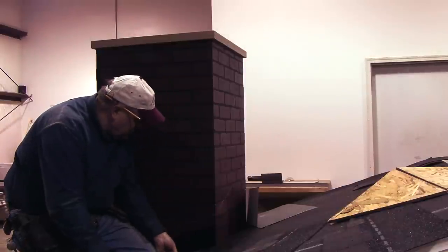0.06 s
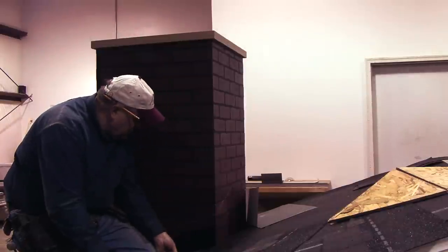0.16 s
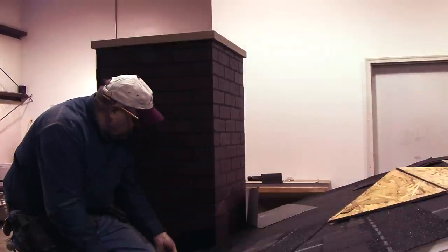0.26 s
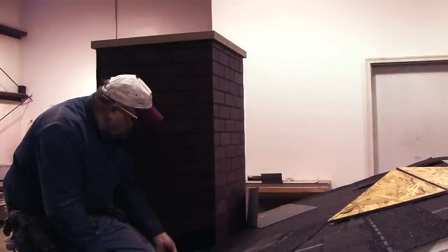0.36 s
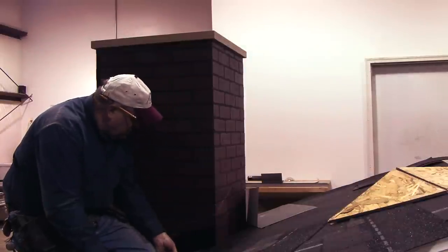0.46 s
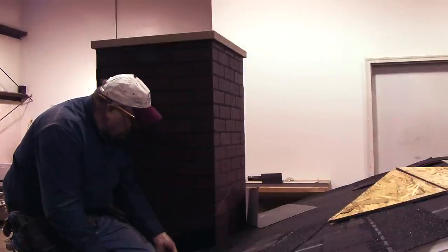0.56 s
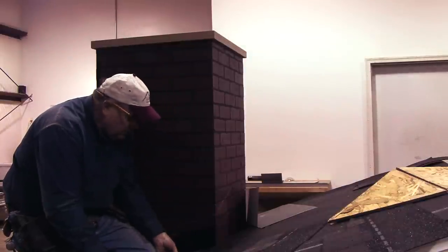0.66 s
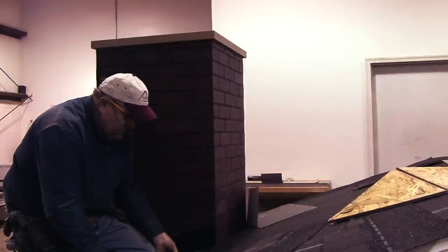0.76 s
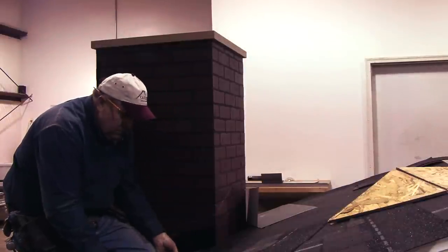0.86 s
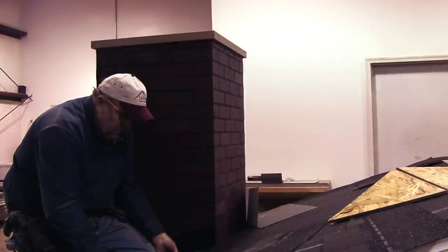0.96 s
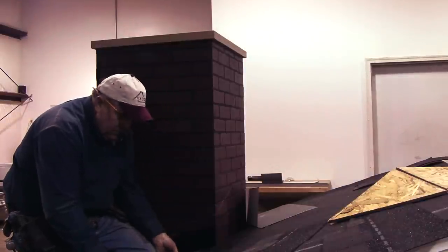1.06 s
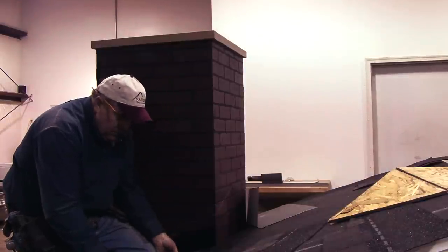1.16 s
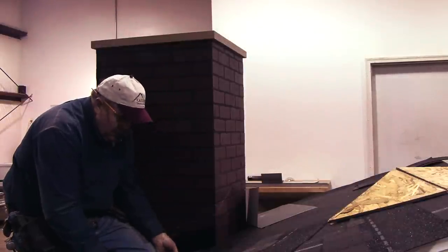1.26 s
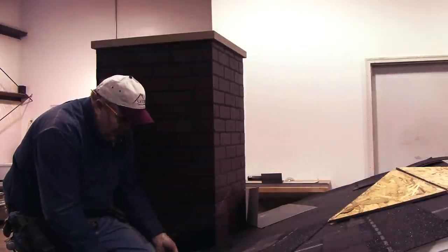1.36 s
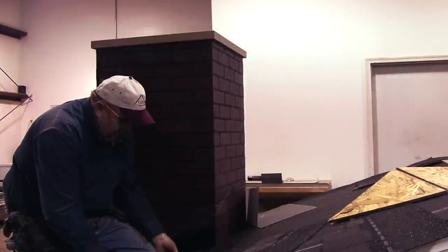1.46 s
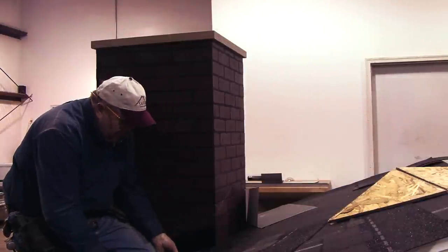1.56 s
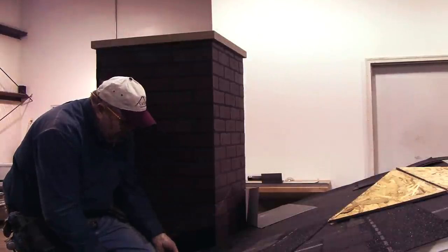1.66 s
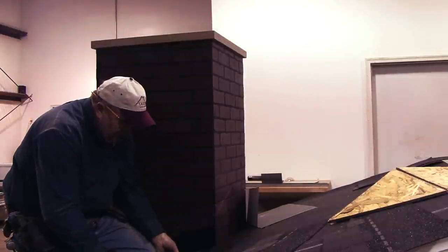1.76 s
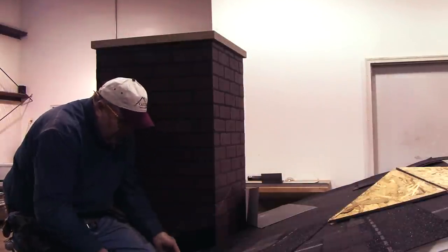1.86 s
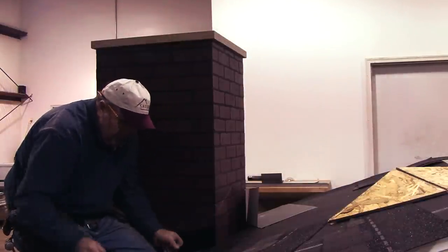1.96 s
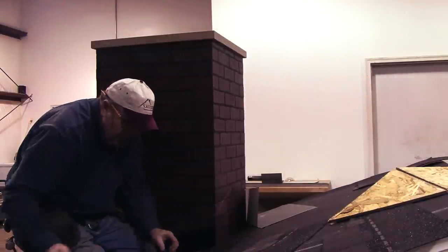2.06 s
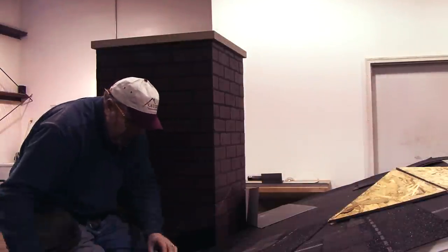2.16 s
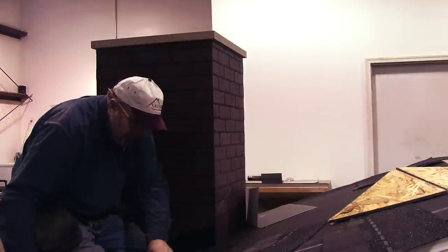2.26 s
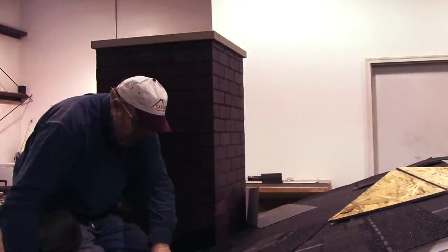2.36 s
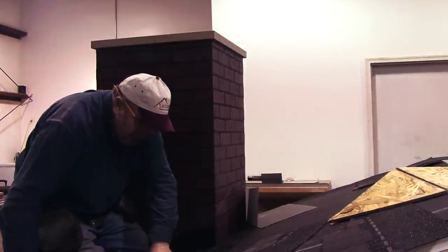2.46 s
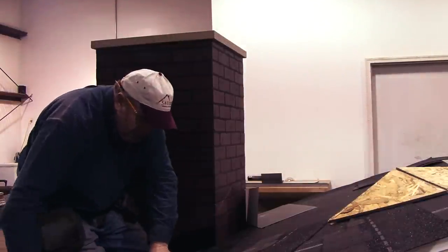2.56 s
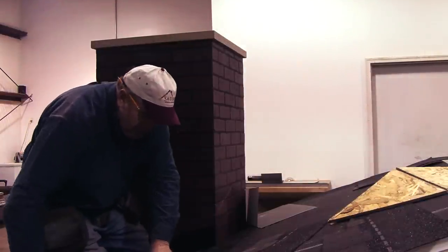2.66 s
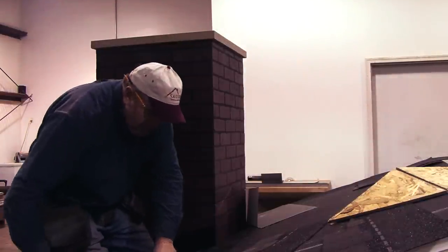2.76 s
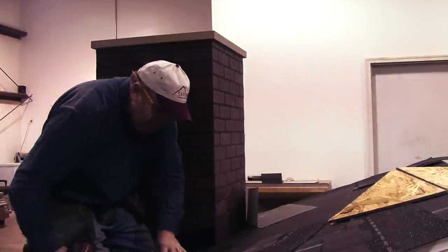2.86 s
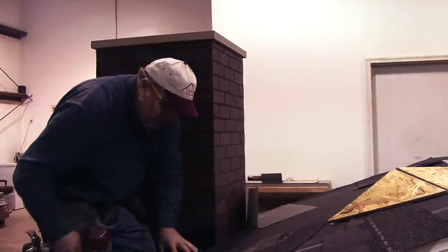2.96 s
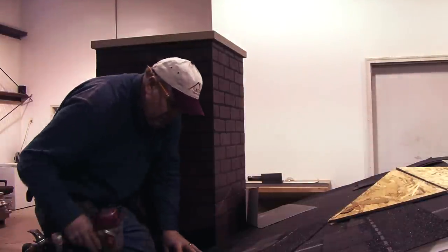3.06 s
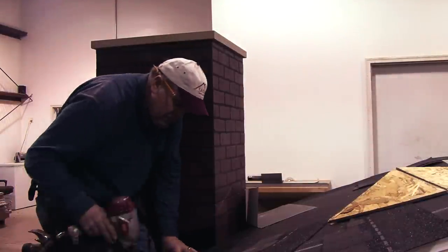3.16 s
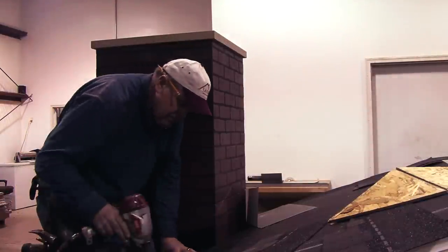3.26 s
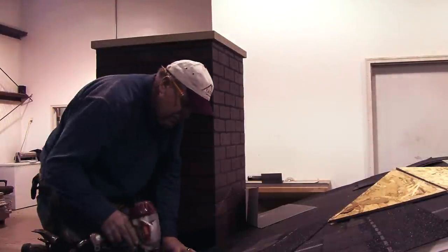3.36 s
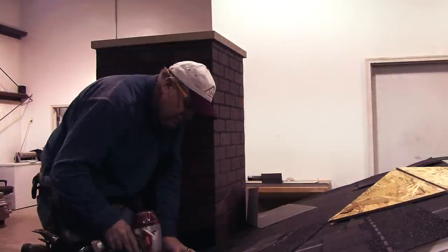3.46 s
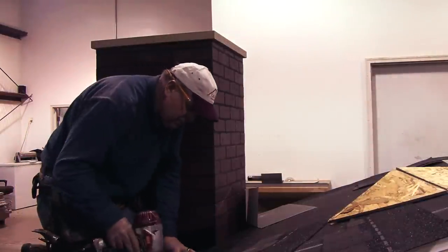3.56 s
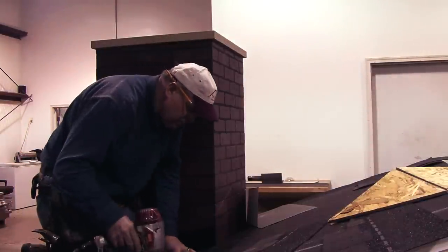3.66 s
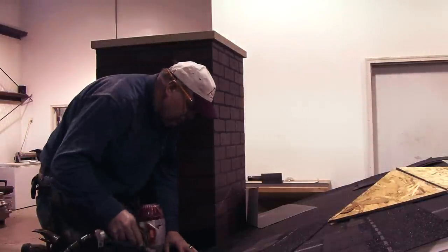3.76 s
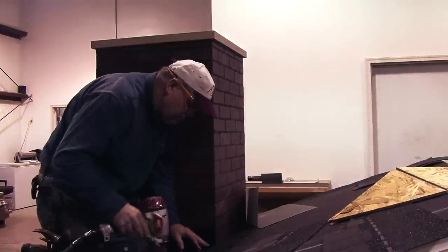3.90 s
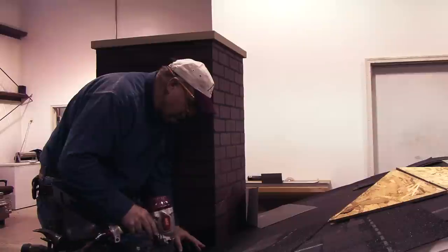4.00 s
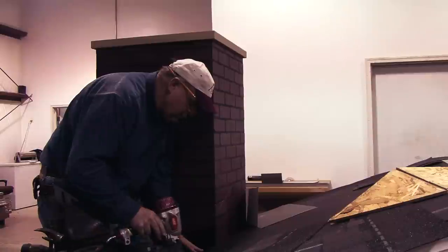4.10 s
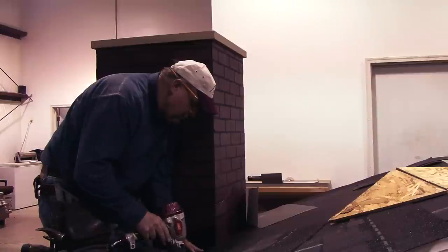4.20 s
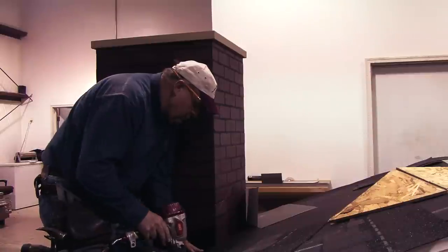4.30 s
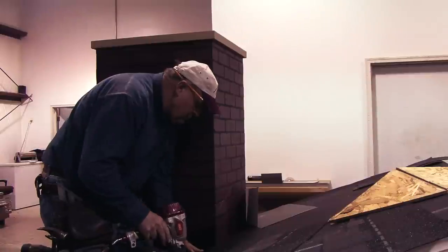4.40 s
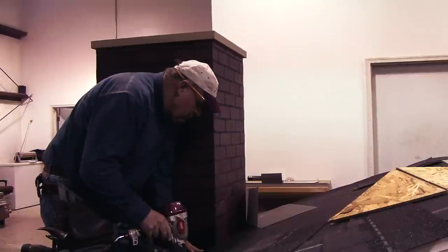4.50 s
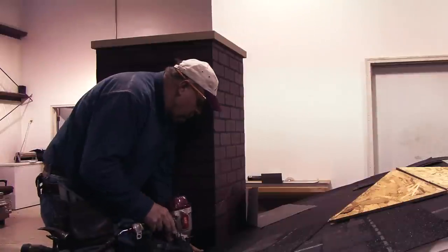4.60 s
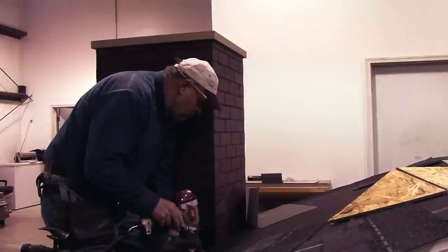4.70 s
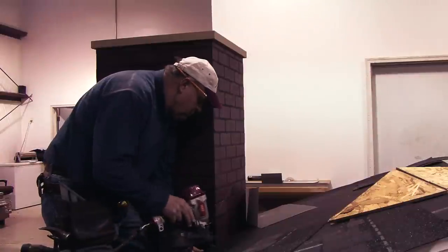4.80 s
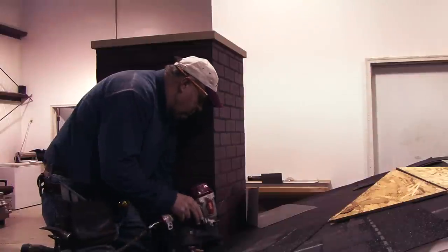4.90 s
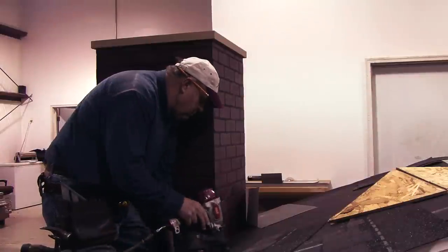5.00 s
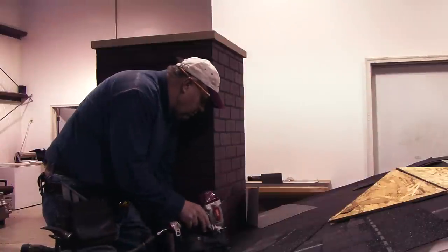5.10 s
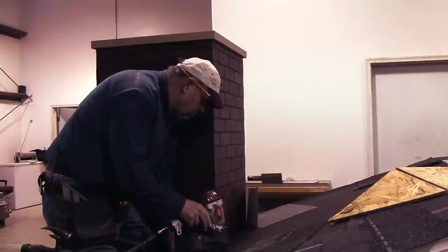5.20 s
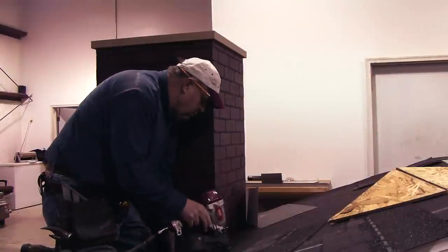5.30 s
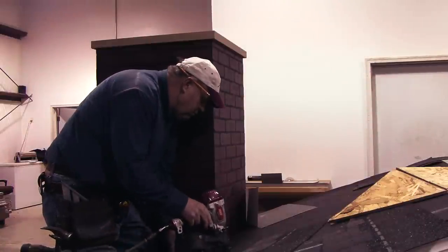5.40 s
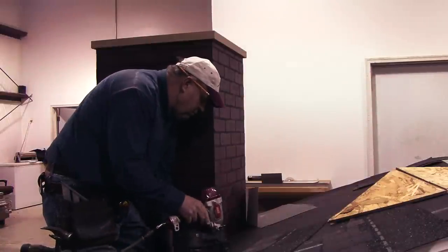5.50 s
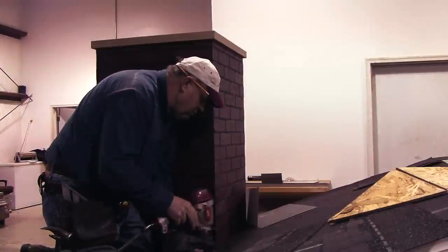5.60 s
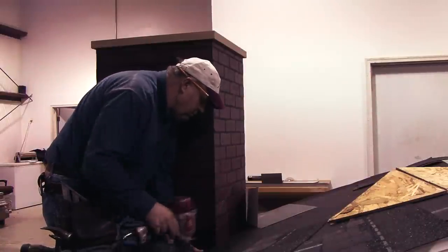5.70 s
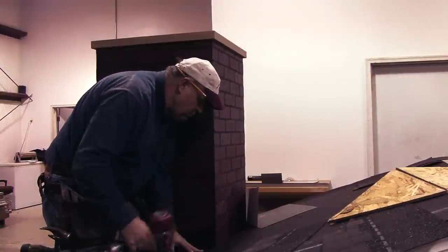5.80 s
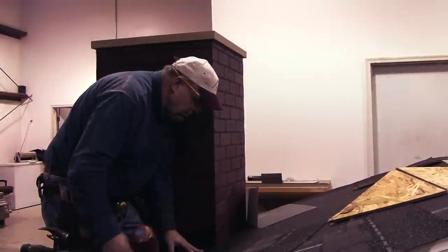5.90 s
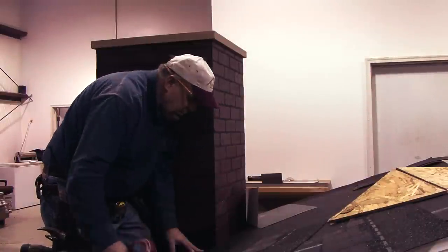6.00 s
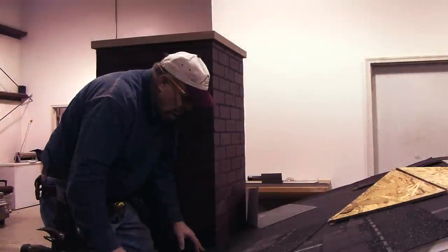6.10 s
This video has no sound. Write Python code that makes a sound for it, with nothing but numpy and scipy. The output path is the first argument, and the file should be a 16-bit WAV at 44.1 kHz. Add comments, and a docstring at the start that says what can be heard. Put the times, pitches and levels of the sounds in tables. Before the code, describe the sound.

Three loud shots from an air nailer slam into a wooden roof deck in the second half, each preceded by the knock of its steel nose and followed by a quick exhaust hiss. Before them come quiet rasps and snaps of a shingle being positioned, then rustling and tool clatter. The handling sounds fairly dry, while the shots distort a little and echo briefly through a big room with low ventilation hum.

```python
"""A pneumatic nailer fires three nails into a wooden practice roof: valve hiss, driver crack, slam into
the boards, exhaust blast. Before each shot its steel nose is set down on the deck. First the roofer slides
an asphalt shingle into place: granules rasp and tick, the sheet snaps as it flexes, tool and hose clack.
The shots overload the microphone and ring on in a large workshop, over a low ventilation hum."""
import sys
import numpy as np
from scipy import signal
from scipy.fft import rfft, irfft, next_fast_len
from scipy.io import wavfile
from scipy.ndimage import map_coordinates

SR = 44100
rng = np.random.default_rng(int(sys.argv[2]) if len(sys.argv) > 2 else 0)


def bounce(signal):
    """Save signal as a 16-bit WAV file at the path given by the first command-line argument."""
    frames = np.transpose(np.atleast_2d(signal))
    limited = np.clip(frames, -1, 1)
    pcm = np.round(limited * 32767).astype(np.int16)
    wavfile.write(sys.argv[1], SR, pcm)


N = 271082
T = np.arange(SR // 2) / SR  # time axis of one event


def amp(db):
    """Decibels to gain."""
    return 10 ** (np.asarray(db) / 20)


def unit_rms(x):
    """Scale to rms 1."""
    return x / np.sqrt(np.mean(x ** 2) + 1e-20)


def curve_at(points, hz):
    """Interpolate (freq_hz, value) points on a log frequency axis."""
    freqs_hz, values = np.transpose(points)
    return np.interp(np.log(hz + 1), np.log(freqs_hz + 1), values)


def filtered(x, response):
    """Apply a frequency response by FFT."""
    size = next_fast_len(len(x) + min(len(x), SR) // 4)
    return irfft(rfft(x, size) * response(np.fft.rfftfreq(size, 1 / SR)), size)[:len(x)]


def noise(spectrum, tilt_db_oct=0, size=len(T)):
    """Unit-rms noise of a given spectral shape, tilted above 500 Hz."""
    white = rng.standard_normal(size)
    shaped = filtered(white, lambda hz: amp(curve_at(spectrum, hz) + tilt_db_oct * np.log2(1 + hz / 500)))
    return unit_rms(shaped)


def resonance(centre_hz, width_hz, size=len(T)):
    """Unit-rms noise through two identical band-passes."""
    def bandpass(hz):
        return 1j * hz * width_hz / (centre_hz ** 2 - hz * hz + 1j * hz * width_hz)
    return unit_rms(filtered(rng.standard_normal(size), lambda hz: bandpass(hz) ** 2))


def burst(rise_s, hold_s, t60_s, size=len(T)):
    """Envelope: rise, hold, exponential decay."""
    t = T[:size]
    return (1 - np.exp(-t / rise_s)) * np.exp(-np.log(1000) * np.maximum(t - hold_s, 0) / t60_s)


def wander(rate_hz, size=len(T)):
    """Random values at rate_hz, joined by straight lines."""
    return map_coordinates(rng.standard_normal(size), [np.arange(size) * rate_hz / SR], order=1)


def add(track, start_s, sound):
    """Mix a sound in at start_s."""
    part = track[max(round(start_s * SR), 0):][:len(sound)]
    part += sound[:len(part)]


# Moving air: freq_hz, level_db
AIR_SPECTRUM = [(25, -18.5), (50, -20.5), (80, 10), (120, -3), (190, -6.5), (280, -13), (430, -7.5),
                (600, -12.5), (1000, -19), (2000, -17.5), (3500, -28), (6500, -33), (9000, -28),
                (15500, -39.5)]

def ventilation(hum_hz=82.8):
    """A wavering low hum, a wash of air and a thin high hiss."""
    hum = amp(-56.5) * np.sin(2 * np.pi * hum_hz * np.arange(N) / SR)
    waver = amp(-63) * resonance(82, 22, size=N)
    air = amp(-59.5) * noise(AIR_SPECTRUM, size=N)
    hiss = amp(-71.5) * resonance(6400, 750, size=N)
    return hum + waver + air + hiss


# Hall decay: freq_hz, t60_s
HALL_DECAY = [(80, 0.28), (300, 0.55), (700, 0.49), (2000, 0.8), (4000, 0.89), (6000, 0.82), (8000, 0.68),
              (11000, 0.49), (15500, 0.47)]
# Hall colour: freq_hz, gain_db
HALL_TONE = [(60, 6.5), (250, -10.5), (600, -2), (1000, -2.5), (1700, -6.5), (3500, -3.5), (7000, -5),
             (11000, -2), (15500, -14.5)]

def hall(x, build_s=0.21):
    """Far walls return a diffuse tail that swells, then dies at each band's own rate."""
    hz, t, spectrum = signal.stft(x, SR, nperseg=256)
    decay = np.exp(-np.log(1000) * t / curve_at(HALL_DECAY, hz)[:, None])
    tail_power = (decay * (1 - np.exp(-t / build_s))) ** 2
    tail_power /= tail_power.sum(axis=1).mean()
    energy = np.abs(signal.fftconvolve(np.abs(spectrum) ** 2, tail_power, axes=1))[:, :len(t)]
    wash = signal.stft(rng.standard_normal(N), SR, nperseg=256)[2]
    tail = wash / wash.std() * np.sqrt(energy) * amp(curve_at(HALL_TONE, hz))[:, None]
    return signal.istft(tail, SR, nperseg=256)[1][:N]


def reflections(x, t60_s):
    """Scattered early echoes off roof and chimney."""
    echoes = rng.standard_normal(len(T)) ** 3 * burst(0.004, 0.012, t60_s)
    return signal.fftconvolve(x, echoes / np.linalg.norm(echoes))[:N]


# Friction on grit: freq_hz, level_db
GRIT_SPECTRUM = [(120, -16.5), (250, -13), (450, -6), (900, -1), (1800, -2.5), (3000, -3), (7700, 0),
                 (10000, -7), (14500, -12.5), (16000, -11)]
# Hand activity: time_s, level_db
RUSTLE_LEVELS = [(0, -59), (1.502, -65.5), (1.65, -82), (2.27, -74), (2.35, -46), (2.8, -53), (3.25, -61),
                 (3.35, -78)]

def rustle(grain_db=5, grain_rate_hz=250):
    """Sleeves and shingle rustle while the hands are busy."""
    level_db = np.interp(np.arange(N) / SR, *np.transpose(RUSTLE_LEVELS))
    friction = noise(GRIT_SPECTRUM, tilt_db_oct=-2, size=N)
    grain = unit_rms(amp(grain_db * wander(grain_rate_hz, size=N)))
    return amp(level_db) * friction * grain


# Shingle, hand and hose strokes on the roof: start_s, length_s, level_db, tilt_db_oct, ring_hz
STROKES = [(0.119, 0.05, -46.5, 2, 900), (0.196, 0.1, -45.5, 1, 880), (0.354, 0.066, -52.5, -1, 2060),
           (0.541, 0.061, -46, 0, 2120), (0.604, 0.067, -38, -1.5, 1900), (0.828, 0.057, -44.5, -2.5, 1420),
           (0.898, 0.095, -41, 0, 1410), (0.968, 0.093, -54, -3.5, 1430), (1.103, .14, -47.5, -2.5, 795),
           (1.323, 0.1, -42, 0, 1370), (1.504, 0.099, -45.5, 0, 2970), (1.838, 0.12, -54, -3, 950),
           (2.293, 0.031, -35, 0.5, 5200), (2.37, 0.044, -31, -3, 1350), (2.402, 0.12, -42.5, -5, 1310),
           (2.523, 0.043, -37.5, -3, 2100), (2.592, 0.22, -35.5, -3, 522), (2.915, 0.14, -52.5, -7.5, 670),
           (3.032, 0.083, -52, -1.5, 744), (3.183, 0.12, -41.5, -3, 1300), (4.122, 0.022, -34.5, -2, 1850),
           (4.267, .064, -35.5, -1, 710), (5.829, 0.16, -28.5, -3, 2370), (6.01, 0.069, -27.5, -4.5, 757)]

def scuffs(grain_db=7, grain_rate_hz=380, catch_db=3, catch_rate_hz=70):
    """Mineral granules catch and slip; the bent sheet rings, more so under dull strokes."""
    out = np.zeros(N)
    for start_s, length_s, level_db, tilt_db_oct, ring_hz in STROKES:
        grip_db = grain_db * np.tanh(wander(grain_rate_hz)) + catch_db * wander(catch_rate_hz)
        rasp = noise(GRIT_SPECTRUM, tilt_db_oct)
        ring = amp(-15.5 - 2.1 * tilt_db_oct) * resonance(ring_hz, 0.17 * ring_hz)
        envelope = np.abs(np.sin(np.pi * np.clip(T / length_s, 0, 1) ** 0.57))
        add(out, start_s, amp(level_db) * (rasp + ring) * unit_rms(amp(grip_db)) * envelope)
    return out


def granule_ticks(per_stroke=4, overrun=1.15, centre_hz=2800, spread_oct=1.3, spread_db=4.5):
    """Loose granules tick at random times and pitches during and just after each stroke."""
    out = np.zeros(N)
    for start_s, length_s, level_db, *_ in STROKES:
        for when, weakness, pitch in rng.random((per_stroke, 3)):
            tick = click(centre_hz * 2 ** (spread_oct * (2 * pitch - 1)), t60_s=0.01)
            add(out, start_s + when * length_s * overrun, amp(level_db - spread_db * weakness) * tick)
    return out


# Crack of a dry contact: freq_hz, level_db
CLICK_SPECTRUM = [(100, -18.5), (300, -2), (900, -2), (2000, 0), (4000, 1), (7000, -2.5), (10000, -8.5),
                  (14500, -11.5), (16000, -18.5)]

def click(ring_hz, t60_s, ring_boost_db=0, mid_hz=2645, size=SR // 10):
    """Dry contact: hard ones are high, bright and spiky; soft ones open slowly and ring more."""
    hardness_oct = np.log2(ring_hz / mid_hz)
    rise_s = 0.028 * t60_s
    spike = amp(-1) * 0.013 / t60_s * burst(0.0001, 0.000082, 0.0013, size)
    crack = noise(CLICK_SPECTRUM, 2.5 * hardness_oct, size) * (burst(rise_s, 0.00013, t60_s, size) + spike)
    ring = resonance(ring_hz, 0.29 * ring_hz, size) * burst(rise_s, 0.00066, 1.05 * t60_s, size)
    return crack + amp(ring_boost_db - 3 - 3.5 * hardness_oct) * ring


# Shingle snaps: start_s, level_db, ring_hz
SNAPS = [(0.079, -45.5, 3200), (.1217, -30.5, 3320), (.463, -31.5, 3930), (.574, -33, 5600),
         (.853, -38.5, 2820), (.880, -39.5, 3920), (.922, -27.5, 5440), (1.152, -35.5, 3350),
         (1.219, -43, 2070), (1.262, -45, 2380), (1.337, -34.5, 4460), (1.564, -35.5, 4770),
         (1.727, -48, 5000), (1.88, -40.5, 4030)]

def shingle_snaps():
    """The sheet snaps as it flexes."""
    out = np.zeros(N)
    for start_s, level_db, ring_hz in SNAPS:
        add(out, start_s, amp(level_db) * click(ring_hz, t60_s=0.031, ring_boost_db=2))
    return out


# Tool contacts: start_s, level_db, ring_hz, t60_s
CLACKS = [(2.3116, -14.5, 4800, 0.024), (2.348, -21.5, 1240, 0.041), (2.437, -24, 4300, 0.049),
          (2.594, -27, 1290, 0.047), (2.674, -30.5, 1850, .025), (2.832, -34.5, 3060, 0.0076),
          (2.907, -40, 610, 0.031), (2.932, -34.5, 657, 0.093), (2.993, -31, 5060, 0.007),
          (3.185, -32, 1220, 0.044), (3.2394, -24, 1700, 0.026), (3.4952, -26, 5800, 0.017),
          (4.391, -29.5, 6140, 0.0089), (4.6391, -5.5, 1700, 0.018), (5.1134, -10, 2420, .009),
          (5.1757, -21, 3100, 0.0095), (5.282, -32.5, 4900, 0.0038), (5.303, -37, 6940, .01),
          (5.3392, -23.5, 4700, .006), (6.019, -24.5, 720, 0.046), (6.051, -20.5, 2840, 0.016),
          (6.081, -24.5, 2020, 0.019)]

def tool_clacks():
    """Nailer parts and hose coupling knock, each at its own pitch."""
    out = np.zeros(N)
    for start_s, level_db, ring_hz, t60_s in CLACKS:
        add(out, start_s, amp(level_db) * click(ring_hz, t60_s))
    return out


# Roof board modes: pitch_hz, level_db, t60_s (before division by damping)
BOARD_MODES = [(62.6, -5, 0.25), (97.8, -5, 0.39), (150, 2.5, 0.2), (198, -2.5, 0.32), (261, 0, 0.21),
               (295.5, -6, 0.3), (341.4, 0.5, 0.16), (401.4, -3, 0.24), (496, -5.5, 0.25), (553.5, 6, 0.17),
               (725, -1, 0.37)]
HARD_REACH_HZ, SOFT_REACH_HZ = 900, 360  # mode roll-off: shot, soft weight

def boards(reach_hz, damping=1.4, swing_hz=170):
    """A blow swings the deck and rings its modes, at new strengths each time."""
    scatter = rng.normal(0, [2.5, 0.019, 1.2], (len(BOARD_MODES), 3))
    ring = np.zeros(len(T))
    for (pitch_hz, level_db, t60_s), (scatter_db, detune, phase) in zip(BOARD_MODES, scatter):
        gain = amp(level_db + scatter_db) / np.sqrt(1 + (pitch_hz / reach_hz) ** 6)
        mode = np.sin(2 * np.pi * pitch_hz * (1 + detune) * T + phase)
        ring += gain * mode * burst(0.0015, 0, t60_s / damping)
    onset_rms = np.sqrt(np.mean(ring[:SR // 50] ** 2))
    swing = -np.sin(2 * np.pi * swing_hz * T) * burst(0.0024, 0.0022, 0.06)
    return ring / onset_rms + amp(3) * swing


# Impact on the gritty deck: freq_hz, level_db
IMPACT_SPECTRUM = [(50, -13.5), (120, -7), (220, -1), (340, -1.5), (600, 0.5), (1000, -3.5), (1700, -4),
                   (2700, -6), (4500, -13.5), (8000, -17.5), (15500, -28)]

def thud(boards_db, crunch_db, reach_hz):
    """Weight lands on the boards and crunches the grit beneath it."""
    wood = amp(boards_db) * boards(reach_hz, damping=1.39)
    crunch = amp(crunch_db) * noise(IMPACT_SPECTRUM) * burst(0.00034, 0.001, 0.072)
    return wood + crunch


# Body contacts: start_s, level_db
BUMPS = [(2.442, -47), (2.676, -44), (5.358, -45), (5.845, -37)]

def bumps():
    """Knees and hands bump the boards."""
    out = np.zeros(N)
    for start_s, level_db in BUMPS:
        add(out, start_s, thud(level_db, level_db + 8.5, SOFT_REACH_HZ))
    return out


# Nailer set on the deck: start_s, nose_db, weight_delay_s, weight_db, crunch_db
LANDINGS = [(3.501, -18, .021, -26, -19.5), (4.275, -24, 0.032, -41, -43), (5.098, -14.5, .018, -16, -22)]

def nailer_landings():
    """The steel nose touches first; the tool's weight follows."""
    out = np.zeros(N)
    for start_s, nose_db, weight_delay_s, weight_db, crunch_db in LANDINGS:
        add(out, start_s, amp(nose_db) * click(ring_hz=7000, t60_s=0.044))
        add(out, start_s, amp(nose_db) * thud(-16.5, -6.5, SOFT_REACH_HZ))
        add(out, start_s + weight_delay_s, thud(weight_db, crunch_db, SOFT_REACH_HZ))
    return out


# Steel driver: freq_hz, level_db
DRIVER_SPECTRUM = [(50, -34), (120, -1.5), (430, 6.5), (620, -4), (1000, -22), (1800, -12.5), (3000, -8.5),
                   (5000, -7), (6200, 0), (7300, -2), (8400, -1), (9500, -7.5), (15500, -14)]
# After-ring of roof frame and tool body: centre_hz, width_hz, level_db (relative to the shudder)
AFTER_RING = [(203, 37, -20.5), (466, 25, -14.5), (3184, 160, -15.5)]

def slam(bark_db, boards_db, shudder_db):
    """The piston meets its bumper: the steel body rings, the boards bark, the roof shudders on."""
    steel = noise(DRIVER_SPECTRUM) * burst(0.00042, 0.0035, 0.079)
    bark = amp(bark_db) * noise(IMPACT_SPECTRUM) * burst(0.0043, 0.0053, 0.091)
    ring = sum(amp(db) * resonance(hz, width_hz) for hz, width_hz, db in AFTER_RING)
    shudder = noise(IMPACT_SPECTRUM) * burst(0.0047, 0.06, 0.27) + ring * burst(0.01, 0.034, 1.0)
    return steel + bark + amp(shudder_db) * shudder + amp(boards_db) * boards(HARD_REACH_HZ)


# Valve hiss: freq_hz, level_db
VALVE_SPECTRUM = [(120, -53), (200, 1), (874, -23), (1840, -23.5), (5390, -7.5), (6470, -14.5),
                  (7900, -4.5), (9830, -19), (15500, -21)]
# Exhaust air: freq_hz, level_db
EXHAUST_SPECTRUM = [(100, -30.5), (250, -2.5), (900, -29), (2200, -12), (3500, -13), (4100, -7), (5200, -9),
                    (6300, -3.5), (7300, -4), (8200, -0.5), (9500, -6.5), (12000, -9), (15500, -8.5)]
# Shots: fire_s, exhaust_s, valve_lead_s, bark_db, boards_db, shudder_db
SHOTS = [(3.727, 3.7737, 0.013, 2, -12.5, -30), (4.5367, 4.651, 0.0087, -2.5, -17, -24),
         (5.5135, 5.557, .0095, 5, -14, -14)]

def nailer(seat_delay_s=0.0112, recoil_delay_s=0.036, return_delay_s=0.032):
    """Air fills the cylinder, the driver strikes, the nail seats; trigger release dumps the air."""
    out = np.zeros(N)
    for fire_s, exhaust_s, valve_lead_s, bark_db, boards_db, shudder_db in SHOTS:
        hiss = amp(-19.5) * noise(VALVE_SPECTRUM) * burst(0.0011, 0.0089, 0.03)
        add(out, fire_s - valve_lead_s, hiss)
        crack = amp(-0.5) * noise(DRIVER_SPECTRUM) * burst(0.00026, 0.0028, 0.038)
        add(out, fire_s, crack)
        add(out, fire_s + seat_delay_s, slam(bark_db, boards_db, shudder_db))
        nose_recoil = amp(bark_db - 33) * thud(0, 14, HARD_REACH_HZ)
        add(out, fire_s + recoil_delay_s, nose_recoil)
        blast = amp(1.18) * noise(EXHAUST_SPECTRUM) * burst(0.0018, 0.023, 0.083)
        add(out, exhaust_s, blast)
        piston_return = amp(-27.5) * thud(0, 14, HARD_REACH_HZ)
        add(out, exhaust_s + return_delay_s, piston_return)
    return out


def scene():
    """The loud shots fill the hall; the quiet handling sounds drier."""
    shots = nailer()
    handling = nailer_landings() + bumps() + scuffs() + granule_ticks()
    handling += shingle_snaps() + tool_clacks() + rustle()
    near = amp(-17.5) * reflections(shots, t60_s=0.29) + amp(-12) * reflections(handling, t60_s=0.32)
    far = hall(amp(-12.5) * shots + amp(-18.5) * handling)
    return np.tile(shots + handling + near + far + ventilation(), (2, 1))


def record(dry, knee=4, sag=0.72, offset=0.25, sag_hz=25, coupling_hz=6, lowpass_hz=15900):
    """The microphone stage saturates, sags and drifts off centre; its capacitor drains the offset."""
    saturated = dry[0] / (1 + np.abs(dry[0]) ** knee) ** (1 / knee)
    load = filtered(saturated ** 2, lambda hz: 1 / (1 + 1j * hz / sag_hz) ** 2)
    sagged = saturated * (1 - sag * load) - offset * load
    coupled = filtered(sagged, lambda hz: 1j * hz / (coupling_hz + 1j * hz))
    out = filtered(coupled, lambda hz: 1 / (1 + (hz / lowpass_hz) ** 160))
    return np.tile(out, (2, 1))


dry = scene()
out = record(dry)
bounce(out)
```